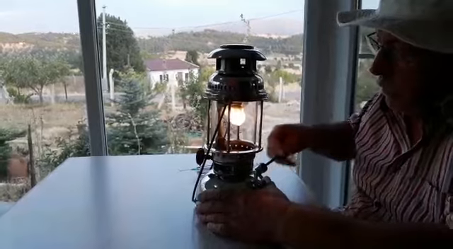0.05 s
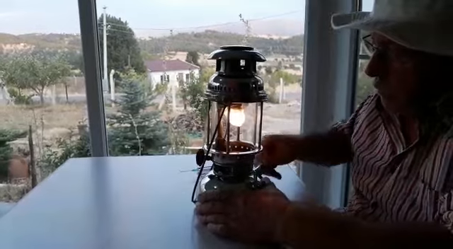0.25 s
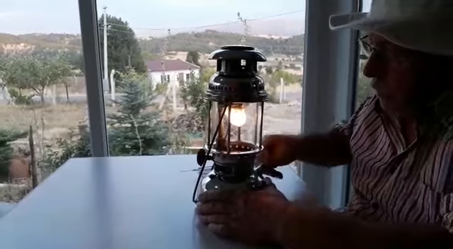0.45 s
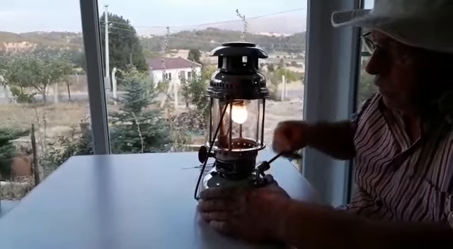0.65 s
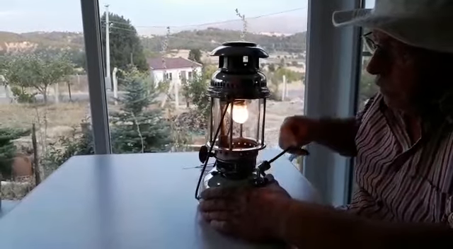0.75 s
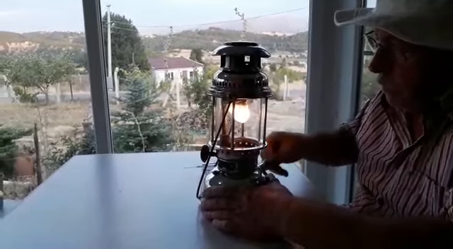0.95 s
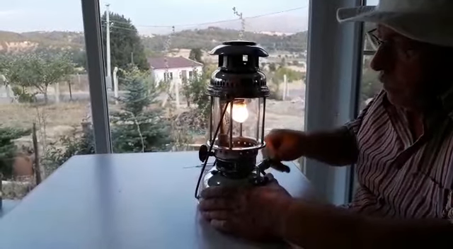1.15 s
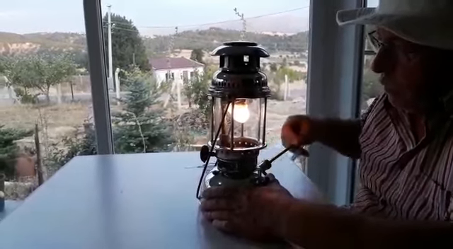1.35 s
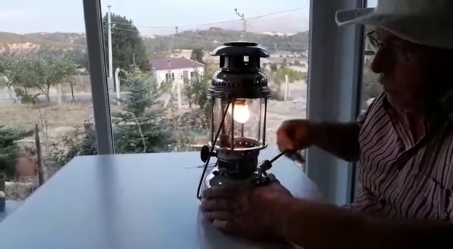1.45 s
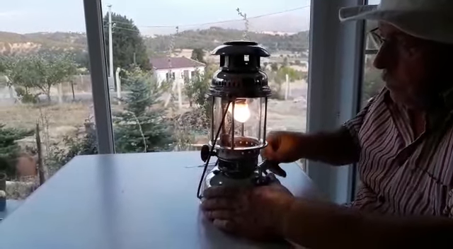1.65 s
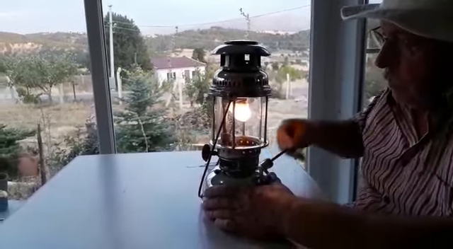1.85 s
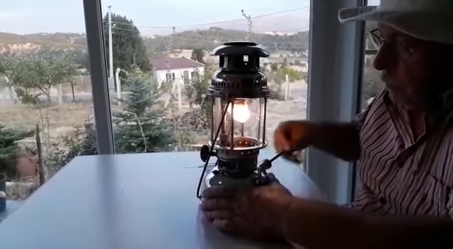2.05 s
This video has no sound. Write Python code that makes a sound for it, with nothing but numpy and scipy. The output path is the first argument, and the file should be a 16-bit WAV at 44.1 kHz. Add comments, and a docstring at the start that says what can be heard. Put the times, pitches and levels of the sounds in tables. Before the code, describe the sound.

Three strokes of a lantern's hand pump rasp and clank over a faint burner hiss.

```python
"""Pumping a pressure lantern

A lantern on a table is pumped by hand three times in a small hard room. On each push the leather piston
rasps and groans, then the plunger hits home: the tin body clanks and the table thuds. The check valve
pings shut, the rod ticks as it is drawn back, and the burner hisses faintly throughout."""
import sys
import numpy as np
from scipy import signal
from scipy.fft import rfft, irfft
from scipy.io import wavfile
from scipy.ndimage import uniform_filter1d

SR = 44100
rng = np.random.default_rng(int(sys.argv[2]) if len(sys.argv) > 2 else 0)


def to_wav(s):
    """Save 16-bit WAV."""
    ch = np.atleast_2d(s).T  # columns
    pcm = np.round(np.clip(ch, -1, 1) * 32767)  # PCM
    wavfile.write(sys.argv[1], SR, pcm.astype(np.int16))


N = 92610
T = np.arange(SR) / SR  # 1 s time axis of one event


def amp(db):
    """Decibels to gain."""
    return 10 ** (np.asarray(db) / 20)


def rise(rise_s):
    """Linear attack to unity."""
    return np.minimum(T / rise_s, 1)


def fade(t60_s, hold_s=0):
    """Unity for hold_s, then down 60 dB per t60_s."""
    return np.exp(-np.log(1000) * np.maximum(T - hold_s, 0) / t60_s)


def arch(length_s):
    """Half-sine swell and fall."""
    return np.sin(np.pi * rise(length_s))


def noise(count=SR):
    """White noise."""
    return rng.standard_normal(count)


def grains(rate_per_s):
    """Sparse random clicks, unit power."""
    return np.sign(noise()) * (rng.random(SR) < rate_per_s / SR) * np.sqrt(SR / rate_per_s)


def drift(window_samples):
    """Smoothed noise, unit power."""
    return uniform_filter1d(noise(), size=window_samples) * np.sqrt(window_samples)


def lookup(curve, freq_hz):
    """Interpolation on a log-frequency axis."""
    points_hz, values = np.transpose(curve)
    return np.interp(np.log(freq_hz + 1), np.log(points_hz + 1), values)


def colour(x, *spectra, size=4096):
    """Minimum-phase filter of unit energy, shaped by the summed (freq_hz, gain_db) spectra."""
    freq_hz = abs(np.fft.fftfreq(size, 1 / SR))
    log_gain = np.log(amp(sum(lookup(spectrum, freq_hz) for spectrum in spectra)))
    response = np.exp(np.conj(signal.hilbert(log_gain)))
    taps = np.fft.ifft(response).real[:size // 2]
    return signal.fftconvolve(x, taps / np.linalg.norm(taps))[:len(x)]


def band_decay(decays, hold_s=0):
    """Dense ringing: noise with a separate decay per band."""
    spectrum, freq_hz = rfft(noise()), np.fft.rfftfreq(SR, 1 / SR)
    centres_hz, t60s_s = np.transpose(decays)
    weights = [lookup(np.c_[centres_hz, band], freq_hz) for band in np.eye(len(decays))]
    return sum(irfft(spectrum * weight, SR) * fade(t60_s, hold_s)
               for weight, t60_s in zip(weights, t60s_s))


def ring(modes):
    """Struck metal: damped sines of random phase, unit power at onset."""
    sound = sum(amp(db) * fade(t60_s) * np.sin(2 * np.pi * (hz * T + rng.random()))
                for hz, db, t60_s in modes)
    return sound / np.sqrt(sum(amp(db) ** 2 for _, db, _ in modes) / 2)


def add(mix, start_s, sound):
    """Mixes a sound in at start_s, trimmed to fit."""
    start = round(start_s * SR)
    sound = sound[max(-start, 0):]
    part = mix[max(start, 0):][:len(sound)]
    part += sound[:len(part)]


# freq_hz, gain_db
BURNER_SPECTRUM = [(25, -23), (60, -69), (110, 7), (190, 1), (300, 4), (450, 13), (650, -4), (1000, 5.5),
                   (1400, 4), (2200, 10), (3400, 1), (4800, 8), (7000, -3), (9800, -15), (13000, -9.5),
                   (16000, -10)]

def burner_hiss(level_db=-55.5):
    """The burner hisses steadily."""
    return amp(level_db) * colour(noise(N + SR), BURNER_SPECTRUM)[SR:]


# start_s, length_s, level_db
DRAWS = [(-.12, 0.27, -51.5), (0.519, 0.23, -51.5)]
# freq_hz, gain_db
DRAW_SPECTRUM = [(200, 6), (900, -6.5), (1500, -7), (2300, 8.5), (3300, 0.5), (5000, 3.5), (7500, -7.5),
                 (9500, -25), (16000, -14)]

def air_draw(length_s, level_db):
    """Air is drawn along the barrel."""
    return amp(level_db) * arch(length_s) * colour(noise(), DRAW_SPECTRUM)


# start_s, length_s, pitch_hz, level_db
SQUEAKS = [(0.0, .18, 485, -58.5), (0.371, 0.05, 651, -39.5), (1.23, 0.2, 512.5, -54.5)]

def leather_squeak(length_s, pitch_hz, level_db, bend=0.037, jitter=0.012):
    """The leather sings faintly on release and return, its pitch following the rod's speed."""
    speed = arch(length_s)
    cycles = np.cumsum(pitch_hz * (1 + bend * speed + jitter * drift(256))) / SR
    return amp(level_db) * speed * np.sin(2 * np.pi * cycles)


# start_s, level_db
NUDGES = [(0.0, -56.5), (0.401, -45), (0.792, -51.5), (1.423, -60), (1.75, -44.5), (2.0, -49.5)]
# freq_hz, gain_db
THUD_SPECTRUM = [(25, -45), (48, -33), (72, -17), (97, 1), (118, -18), (138, 8.5), (168, 5), (197, 7),
                 (226, 2.5), (250, -2.5), (400, -4), (900, -62)]

def table_thud(level_db, rise_s=0.019, t60_s=0.34):
    """The table booms under a plunger hit, or as the steadying hand nudges the lantern."""
    return amp(level_db) * colour(noise() * rise(rise_s) * fade(t60_s, rise_s), THUD_SPECTRUM)


# start_s, level_db, low_db, middle_db, bright_db, top_db, t60_s, rod_db
TICKS = [(0.020, -48, 26, 11, -3, 14, 0.14, -24), (0.2342, -21.5, 16.5, -8, 4, 7, 0.04, -18),
         (0.2842, -15, 1, 3, 1, -1, 0.034, -34), (0.417, -22, -2, 24, -18, -35, .01, -33),
         (0.5358, -28.5, -7.5, -8, 2, 7, 0.071, -12.5), (0.8178, -36, -14.5, 3.5, 16, 19.5, 0.15, -19),
         (0.968, -21, 12.5, -14, -12, 8, 0.033, -13), (1.4102, -35.5, 0, -3.5, -21, -5, 0.086, -30),
         (1.4322, -36.5, -13, -24, -9, 18, 0.023, -30), (1.4362, -31.5, -1.5, 0, -27, -30, 0.077, -28),
         (1.5745, -19.5, -27, -5, -9, -31, 0.047, -42), (2.002, -45.5, 11, 13, -6, -14, 0.11, -24),
         (2.015, -39, 0.5, 3.5, 9, 20, 0.2, -22)]
# freq_hz, gain_db
TICK_SPECTRUM = [(100, -20), (200, 3.5), (260, -9.5), (500, -6.5), (1000, 1), (1400, -2), (2200, 7),
                 (3400, -7), (4200, -1), (5400, 1.5), (7300, -5.5), (9500, -29), (12500, -38.5),
                 (16000, -24)]
SNAP_SPECTRUM = [(500, -24), (4000, -14), (7500, 8.5), (9500, -12), (12500, -4.5), (16000, -4)]
# freq_hz, level_db, t60_s
ROD_VALVE_MODES = [(2377, -5, .5), (4030, -2, .25), (5100, -7, .12), (5988, 0, .17), (6650, -7, .18),
                   (7016, -6, .2)]
TANK_HOOD_MODES = [(662, -1, .2), (867, -9, .22), (1015, -4, .19), (1156, -4, .22), (1574, -4, .28),
                   (1802, -1, .28), (1922, -4, .26), (1991, 0, .28), (2160, -1, .28), (2338, -6, .45),
                   (2443, -2, .3), (2561, -7, .3), (3043, -9, .33), (4020, -6, .26), (4845, -6, .2)]

def tick(level_db, low_db, middle_db, bright_db, top_db, t60_s, rod_db):
    """Rod, cap or finger knocks lightly: a contact snap, a ringing rod and a trace of the body."""
    eq = [(900, low_db), (2000, middle_db), (4500, 0), (5800, 0), (7600, bright_db), (12000, top_db)]
    snap = amp(top_db - 13.5) * colour(noise() * fade(t60_s=0.012), SNAP_SPECTRUM)
    rod = amp(rod_db) * ring(ROD_VALVE_MODES)
    knock = colour(noise() * fade(t60_s), TICK_SPECTRUM, eq)
    body = amp(-19.5) * ring(TANK_HOOD_MODES)
    return amp(level_db) * (knock + snap + rod + body)


# start_s, length_s, rasp_db, bass_db, middle_db, top_db, groan_hz, groan_db, groan_t60_s
PUSHES = [(0.198, 0.033, -33, -2.5, -3, 5, 452, -38, 0.13),
          (0.9238, 0.065, -33, -10.5, 6.5, 0, 335.6, -25.5, 0.13),
          (1.5531, 0.05, -28.5, -13.5, -2, -6.5, 431, -20, 0.23)]
# freq_hz, gain_db
RASP_SPECTRUM = [(60, 0), (170, 9.5), (400, 4), (1100, -0.5), (1500, -6.5), (2300, -3), (3400, -11),
                 (4800, -4), (7000, -10), (9500, -18.5), (12500, -19), (16000, -22)]

def piston_rasp(length_s, level_db, bass_db, middle_db, top_db, bite_db=4, bite_s=0.024, uneven_db=5.5):
    """Leather and air scrape down the barrel: the leather grabs, then drags unevenly in tiny slips."""
    scrape = (noise() + amp(-1) * grains(rate_per_s=1200)) / np.sqrt(2)
    drag = amp(bite_db * np.exp(-T / bite_s) + uneven_db * np.tanh(drift(128)))
    stroke = rise(0.0051) * drag * fade(t60_s=0.046, hold_s=length_s)
    eq = [(180, bass_db), (1000, middle_db), (2000, 0), (7000, 0), (12000, top_db)]
    return amp(level_db) * colour(scrape * stroke, RASP_SPECTRUM, eq)


# harmonic, level_db
GROAN_HARMONICS = [(1, -0.5), (2, -48), (3, -28)]

def piston_groan(length_s, pitch_hz, level_db, t60_s, onset_hz=465, settle_s=0.008, jitter=0.014):
    """The piston chatters; its pitch drops and settles as pressure builds, then the tank rings out."""
    glide_hz = pitch_hz + (onset_hz - pitch_hz) * np.exp(-(T / settle_s) ** 2)
    phase = 2 * np.pi * np.cumsum(glide_hz * (1 + jitter * drift(200))) / SR
    tone = sum(amp(db) * np.sin(harmonic * phase) for harmonic, db in GROAN_HARMONICS)
    low_chatter = amp(-8) * fade(t60_s=0.21) * np.sin(0.81 * phase)
    envelope = rise(0.007) * fade(t60_s, hold_s=length_s - 0.019)
    return amp(level_db) * np.sqrt(2) * (tone + low_chatter) * envelope


# start_s, crack_db, rattle_db, hold_s, ring_db, thud_db, treble_db
PLUNGER_HITS = [(0.2406, -8, -15.5, 0.018, -20.5, -27.5, 5), (0.9828, -8, -20, 0.011, -32, -28.5, 6.5),
                (1.612, -11.5, -22.5, 0.0032, -34.5, -39.5, 4.5)]
# freq_hz, gain_db
CRACK_SPECTRUM = [(100, -70), (400, 10.5), (900, -4), (1400, 2.5), (2000, 8), (2800, -3.5), (3400, -23.5),
                  (4100, -3.5), (5000, 6.5), (5700, -10), (7200, -7.5), (9500, -26), (12500, -22.5),
                  (16000, -21)]
RATTLE_SPECTRUM = [(100, -19.5), (350, -4), (700, -4), (1050, -0.5), (1350, -3), (2000, 9.5), (2700, 3),
                   (3400, -10.5), (4000, -3), (4900, -12), (5600, -10), (7200, -10), (9500, -25),
                   (12500, -18), (16000, -33.5)]
# freq_hz, t60_s
RATTLE_DECAY = [(200, 0.6), (800, 0.25), (2200, 0.15), (5000, 0.24), (13000, 0.095)]

def plunger_clank(crack_db, rattle_db, hold_s, ring_db, treble_db):
    """The plunger hits home: a sharp crack, then loose parts clatter and the tin body rings."""
    tilt = [(2500, 0), (6000, treble_db)]
    crack = colour(noise() * fade(t60_s=0.042), CRACK_SPECTRUM, tilt)
    ringing = band_decay(RATTLE_DECAY, hold_s)
    clatter = amp(-1) * grains(rate_per_s=190) * fade(t60_s=0.087, hold_s=hold_s)
    rattle = colour((ringing + clatter) * rise(0.0037), RATTLE_SPECTRUM, tilt)
    return amp(crack_db) * crack + amp(rattle_db) * rattle + amp(ring_db) * ring(TANK_HOOD_MODES)


# start_s, level_db
VALVE_CLOSINGS = [(1.1571, -29), (1.7392, -23.5)]
# freq_hz, gain_db
PING_SPECTRUM = [(1000, -24), (3500, -14), (5000, -10), (5700, -4), (6050, 6), (6500, -1.5), (7200, -5),
                 (8400, -15), (9500, -34), (12500, -28), (16000, -27)]

def valve_ping(level_db):
    """The spring-loaded check valve snaps shut."""
    snap = colour(noise() * fade(t60_s=0.061), PING_SPECTRUM)
    ringing = amp(-26.5) * ring(ROD_VALVE_MODES)
    return amp(level_db) * rise(0.0011) * (snap + ringing)


# freq_hz, t60_s
ROOM_DECAY = [(120, 0.94), (400, 0.39), (1000, 0.43), (2200, 0.43), (5000, 0.39), (8000, 0.35),
              (14000, 0.29)]
# freq_hz, gain_db
ROOM_SPECTRUM = [(100, -2), (215, 1.5), (255, -14), (330, 4), (600, -0.5), (1000, 0), (2000, 0.5),
                 (5000, -1), (14000, 1.5)]

def room(send):
    """Glazed walls reverberate, longest in the bass."""
    tail = colour(band_decay(ROOM_DECAY) * rise(0.0062), ROOM_SPECTRUM)
    return signal.fftconvolve(send, tail / np.linalg.norm(tail))[:N]


def scene():
    """Pump, table, burner and room, in mono."""
    pump, leather_tones, table = np.zeros((3, N))
    for start_s, length_s, rasp_db, bass_db, middle_db, top_db, groan_hz, groan_db, t60_s in PUSHES:
        add(pump, start_s, piston_rasp(length_s, rasp_db, bass_db, middle_db, top_db))
        add(leather_tones, start_s, piston_groan(length_s, groan_hz, groan_db, t60_s))
    for start_s, crack_db, rattle_db, hold_s, ring_db, thud_db, treble_db in PLUNGER_HITS:
        add(pump, start_s, plunger_clank(crack_db, rattle_db, hold_s, ring_db, treble_db))
        add(table, start_s, table_thud(thud_db))
    for start_s, *knock in TICKS:
        add(pump, start_s, tick(*knock))
    for start_s, level_db in VALVE_CLOSINGS:
        add(pump, start_s, valve_ping(level_db))
    for start_s, level_db in NUDGES:
        add(table, start_s, table_thud(level_db))
    for start_s, length_s, pitch_hz, level_db in SQUEAKS:
        add(leather_tones, start_s, leather_squeak(length_s, pitch_hz, level_db))
    for start_s, length_s, level_db in DRAWS:
        add(pump, start_s, air_draw(length_s, level_db))
    direct = pump + leather_tones + table + burner_hiss()
    reverb = room(amp(-4) * pump + amp(-16) * leather_tones)
    return (direct + reverb)[None]


def record(dry):
    """Microphone bass roll-off, full-scale clipping, band limit."""
    low_cut_hz, high_cut_hz = 38, 15850
    highpass = signal.butter(4, low_cut_hz, "highpass", fs=SR, output="sos")
    lowpass = signal.firwin(511, high_cut_hz, window=("kaiser", 8), fs=SR)
    clipped = np.clip(signal.sosfilt(highpass, dry), -1, 1)
    return signal.oaconvolve(clipped, lowpass[None], "same")


dry = scene()
out = record(dry)
to_wav(out)
```